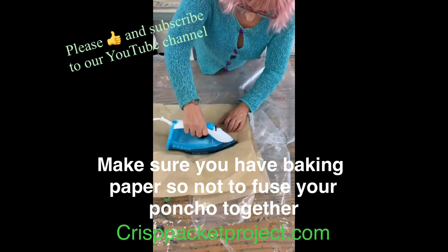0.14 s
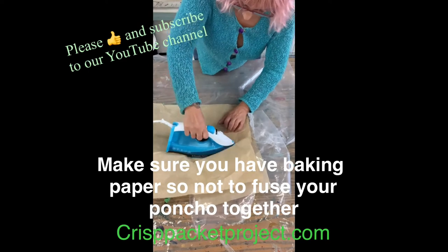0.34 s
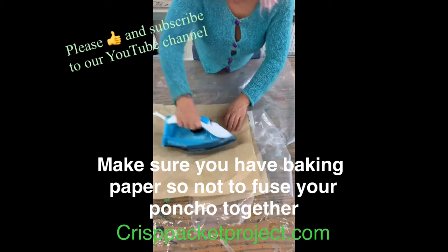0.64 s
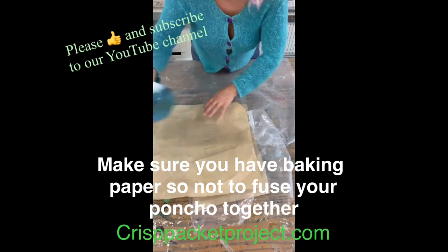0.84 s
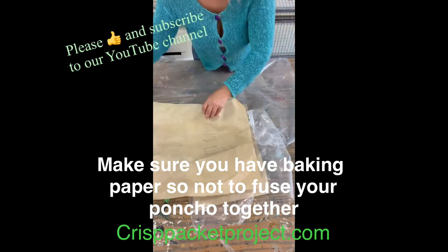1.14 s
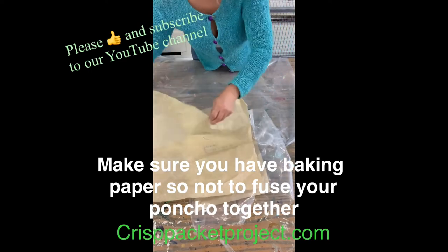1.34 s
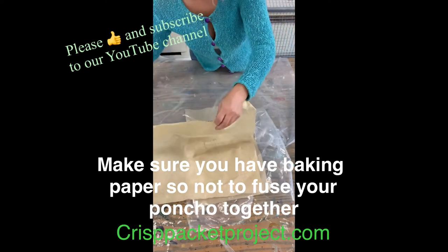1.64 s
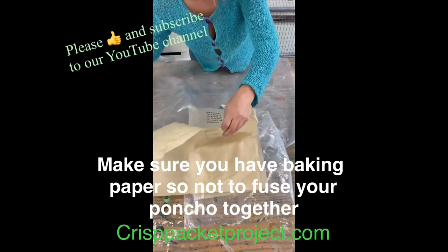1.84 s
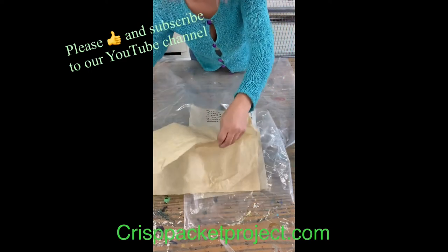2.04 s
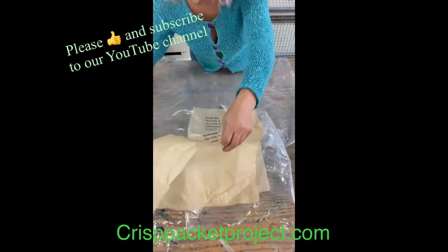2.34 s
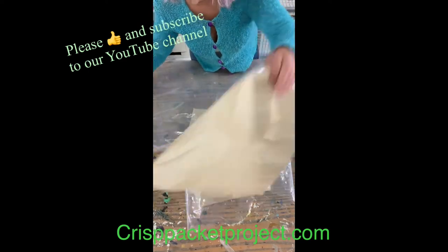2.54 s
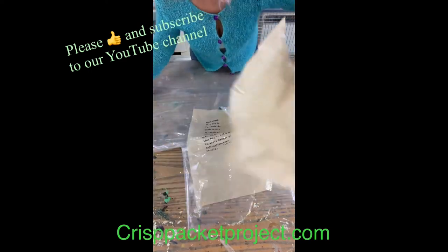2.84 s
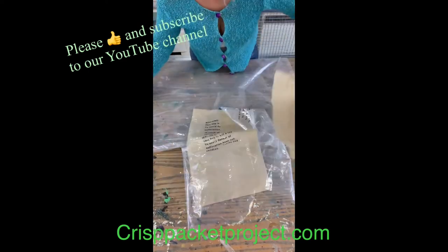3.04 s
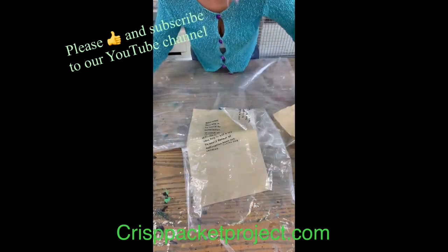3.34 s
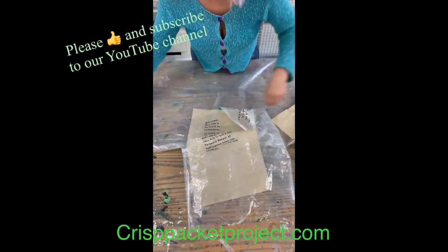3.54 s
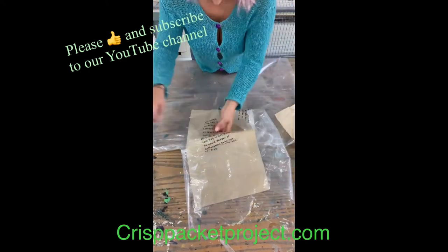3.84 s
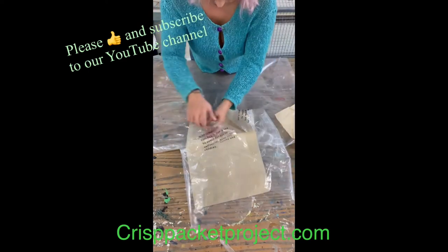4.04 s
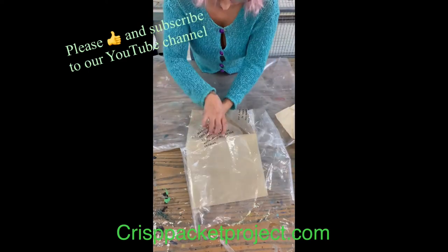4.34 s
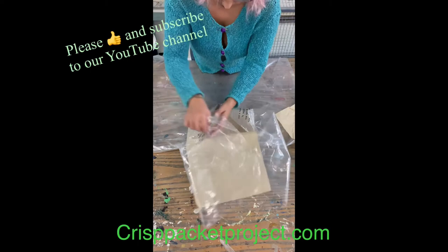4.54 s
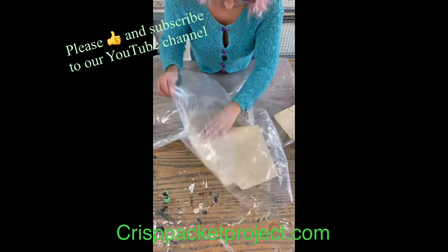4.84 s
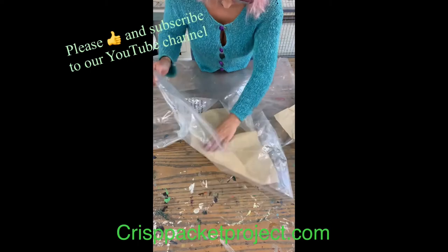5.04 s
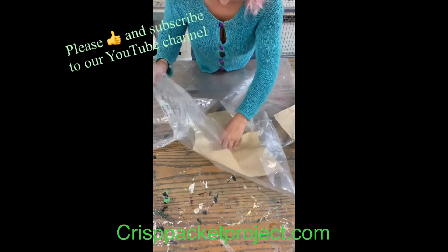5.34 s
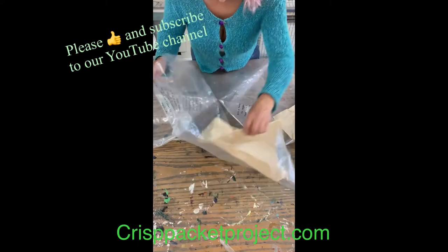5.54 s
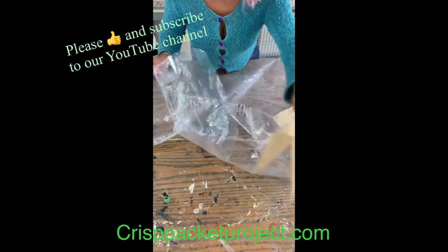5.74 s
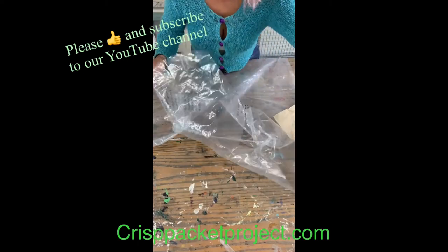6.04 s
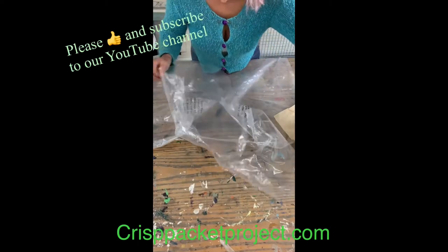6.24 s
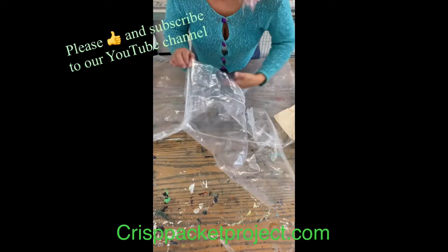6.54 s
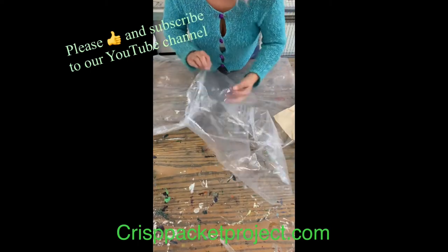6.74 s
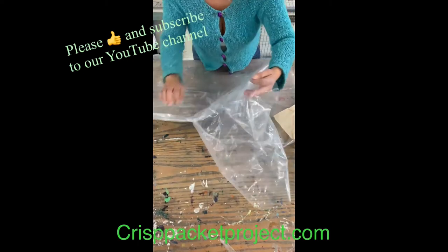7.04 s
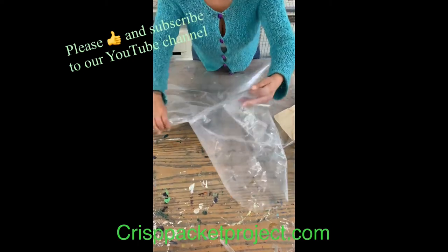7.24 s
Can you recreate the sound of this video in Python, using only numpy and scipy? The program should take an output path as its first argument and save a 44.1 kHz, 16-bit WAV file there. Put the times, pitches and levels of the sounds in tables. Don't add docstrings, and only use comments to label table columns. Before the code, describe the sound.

A close stereo phone pickup at a wooden table in a small, softly humming room. From 0 to 0.6 s stiff baking paper crinkles under a smoothing hand, with bright snaps and duller pops, then nearly stops around 0.8 to 1 s. From 1.1 s the crackle surges; an iron put down on a side board knocks hollowly at about 1.4 s and 1.5 s, hardest at 1.75 s, with a small rattle as it settles. Peeling paper crackles on to 2.4 s, pauses briefly, then snaps and flaps from 2.6 to 3.6 s. Around 3.8 to 4.8 s there are only light touches and faint plastic rustles. Film rustling builds from 4.9 s, densest and loudest at 5.2 to 5.7 s, with a muffled nudge near 5.6 s. Thinner, brighter crackles continue past 6 s and ease off, followed by soft, duller pops from 6.7 to 7.4 s.

```python
import sys
import numpy as np
from scipy import signal
from scipy.fft import rfft, irfft, next_fast_len
from scipy.io import wavfile
from scipy.ndimage import uniform_filter1d, minimum_filter1d, map_coordinates

SR = 44100
rng = np.random.default_rng(int(sys.argv[2]) if len(sys.argv) > 2 else 0)


def store_pcm(level_fs):
    pcm = np.round(np.clip(level_fs, -1, 1) * 32767).astype(np.int16)
    wavfile.write(sys.argv[1], SR, np.atleast_2d(pcm).T)


def ratio_of_db(decibels):
    return 10 ** (np.asarray(decibels, float) / 20)


N = 326340


def unit(x):
    return x / np.sqrt(np.mean(x ** 2) + 1e-20)


def along(points, hz):
    f, v = np.transpose(points)
    return np.interp(np.log(hz + 1), np.log(f + 1), v)


def curves(rows):
    s, *cols = np.transpose(rows)
    return [np.interp(np.arange(N) / SR, s, c) for c in cols]


def wobble(rate):
    knots = rng.standard_normal(int(N * rate / SR) + 4)
    return map_coordinates(knots, [np.arange(N) * rate / SR])


def filtered(x, response):
    m = next_fast_len(N + SR // 2)
    return irfft(rfft(x, m) * response(np.fft.rfftfreq(m, 1 / SR)), m)[..., :N]


def coloured(x, spectrum):
    ends = [(spectrum[0][0] / 2, -70)] + list(spectrum) + [(spectrum[-1][0] * 0.95, -70)]
    cepstrum = irfft(np.log(ratio_of_db(along(ends, np.fft.rfftfreq(4096, 1 / SR)))))
    cepstrum[1:2048] *= 2
    cepstrum[2049:] = 0
    kernel = irfft(np.exp(rfft(cepstrum)))
    return signal.fftconvolve(x, kernel / np.linalg.norm(kernel))[:N]


def bursts(blows, t60, count=12):
    t = np.arange(SR // 20) / SR
    shapes = rng.standard_normal((count, len(t))) * ratio_of_db(-60 * t / t60)
    shapes[:, 0] = 2.6
    which = rng.integers(count, size=N)
    out = np.zeros(N)
    for k in range(count):
        out += signal.fftconvolve(blows * (which == k), shapes[k] / np.linalg.norm(shapes[k]))[:N]
    return out


def patchy(x, depth_db):
    z = signal.stft(x, nperseg=256)[2]
    field = uniform_filter1d(rng.standard_normal(z.shape), size=7, axis=0)
    field = uniform_filter1d(field, size=12, axis=1)
    return signal.istft(z * ratio_of_db(depth_db * unit(field)), nperseg=256)[1][:N]


# peak_s, rise_s, fall_s, crackle_db, flex_over_crackle_db
PAPER_MOVES = [(0.12, 0.14, 0.19, -48.5, 4), (0.39, 0.066, 0.11, -48, 2.5), (0.5, 0.079, 0.11, -55, 4.5),
               (0.67, 0.053, 0.13, -58, 7), (0.97, 0.035, 0.09, -74, 17.5), (1.08, 0.026, 0.28, -50, -2.5),
               (1.23, 0.051, 0.67, -44, 3.5), (1.27, 0.066, 0.11, -41, 5.5), (1.32, 0.073, 0.46, -42, 6.5),
               (1.5, 0.56, 0.3, -51, 0), (1.7, 0.33, 0.12, -48.5, 1.5), (1.85, 0.093, 0.086, -50, 5.5),
               (2.08, 0.22, .05, -73, 17.5), (2.14, 0.048, 0.24, -44.5, 4), (2.27, 0.19, 0.14, -44.5, -0.5),
               (2.42, .15, 0.057, -56.5, -11), (2.59, 0.11, .05, -63.5, 9.5), (2.64, 0.05, 0.16, -47, 5),
               (2.74, 0.094, 0.06, -55, 6.5), (2.86, .11, 0.127, -55, 5.5), (3.01, 0.047, 0.14, -47.5, 1.5),
               (3.2, 0.078, 0.12, -55.5, 4), (3.33, 0.094, 0.2, -52.5, 1), (3.42, 0.15, 0.21, -48.5, -3.5),
               (3.53, .04, 0.067, -57, 4.5), (3.585, .02, 0.041, -58, 4), (3.67, 0.031, 0.074, -58.5, 7.5),
               (3.8, 0.065, 0.055, -63, 6)]
FILM_MOVES = [(3.825, 0.069, .04, -57.5, 6), (3.866, 0.03, 0.052, -51.5, 9), (3.924, .03, 0.052, -53, 2.5),
              (3.96, .1, 0.1, -63.5, 0), (4.05, .15, 0.1, -73.5, 13.5), (4.07, .15, .15, -66, 0),
              (4.2, 0.13, 0.16, -58.5, 6), (4.42, .15, .15, -67, 2), (4.517, .015, 0.17, -59.5, 7.5),
              (4.6, 0.14, 0.88, -59.5, 8), (4.7, 0.041, 0.089, -52, 8.5), (4.86, 0.33, .3, -62, -4),
              (4.93, 0.035, 0.16, -48, 7), (5.0, .1, 0.12, -51, 3.5), (5.05, .02, .1, -47, 2.5),
              (5.105, .02, .1, -46.5, 1), (5.165, .03, 0.11, -45, 1), (5.21, 0.098, .11, -39.5, 3.5),
              (5.34, 0.12, 0.61, -42.5, 1), (5.46, 0.029, 0.11, -40.5, 3.5), (5.51, 0.069, 0.078, -40.5, 5),
              (5.575, 0.044, .08, -42, 4), (5.63, 0.073, 0.029, -35.5, 4), (5.7, .1, 0.44, -48.5, -0.5),
              (5.81, .03, .1, -50, -2), (5.895, 0.053, 0.064, -43, -1.5), (5.945, .04, 0.07, -45.5, -0.5),
              (6.0, 0.16, 0.059, -52, 6), (6.23, 0.02, 0.1, -56, -7), (6.272, .025, .05, -48.5, -12),
              (6.315, 0.032, 0.068, -48, 0.5), (6.37, 0.066, .15, -54.5, 2), (6.55, 0.3, 0.16, -48.5, -7.5),
              (6.64, 0.24, 0.068, -56, 0.5), (6.737, 0.013, 0.04, -53.5, 12),
              (6.767, 0.011, 0.087, -51, 13), (6.81, 0.017, 0.049, -56, 13),
              (6.875, 0.033, .05, -56.5, 14.5), (6.925, .04, 0.051, -52.5, 12),
              (6.965, 0.017, 0.081, -60.5, 15), (7.06, 0.37, 0.11, -62.5, 14),
              (7.25, 0.092, .3, -70.5, 15.5), (7.36, 0.12, 0.16, -55.5, 9.5)]
FADE_DB, BEND = 20, 1.5


def effort(lingers=1, flexing=0, paper_db=0, film_db=0):
    t, power = np.arange(0, N + 64, 64) / SR, 1e-12
    for moves, sheet_db in ((PAPER_MOVES, paper_db), (FILM_MOVES, film_db)):
        for s, rise, fall, db, flex_db in moves:
            away = np.where(t < s, (s - t) / rise, (t - s) / fall) / lingers
            level_db = db + flexing * flex_db + sheet_db - FADE_DB * abs(away) ** BEND
            power = power + ratio_of_db(2 * level_db)
    return np.interp(np.arange(N) / SR, t, 10 * np.log10(power))


def buckles(spectrum, jerks, rate, spread_db, clump_db, t60, hiss):
    chance, size = rng.random((2, N))
    struck = np.clip(rate / SR / (chance + 1e-9) - 1, 0, 1)
    blows = struck * ratio_of_db(-spread_db * np.log(np.clip(size, .004, 1)))
    clumps = ratio_of_db(clump_db * (jerks + 0.53 * wobble(60)))
    grains = unit(bursts(blows, t60)) + hiss * rng.standard_normal(N)
    return unit(clumps * patchy(coloured(grains, spectrum), depth_db=2.0))


# freq_hz, level_db
CRACKLE = [(900, -30), (2100, -10), (3300, 0), (5500, -1.5), (7000, -4), (9500, -4), (13000, -8),
           (16300, -12)]
FLEX = [(300, -22), (600, -6), (1000, -2), (1500, -0.5), (2000, -5), (2600, -9), (3500, -10), (7500, -19.5)]
SAG = [(90, -12.5), (200, -5), (330, -1.5), (450, -3), (650, -5), (1000, -6.5)]
FLEX_LINGERS, SAG_LINGERS = 1.203, 1.59
PAPER_SAG_DB, FILM_SAG_DB = -5, -8.5
AIRBORNE_S, THIN_DB, THIN_HZ = 5.72, -8, 4040


def sheets():
    crackle_db, flex_db = effort(), effort(FLEX_LINGERS, 0.99)
    sag_db = effort(SAG_LINGERS, 1, PAPER_SAG_DB, FILM_SAG_DB)
    jerks = 0.45 * wobble(17) + 0.83 * wobble(55)
    crackle = buckles(CRACKLE, jerks, rate=2000, spread_db=2.0, clump_db=2.5, t60=0.0043, hiss=0.73)
    sheen = filtered(crackle, lambda hz: 1 / (1 + (9000 / (hz + 1)) ** 4))
    sheen_db = np.clip(0.36 * (crackle_db + 37.5), -7, 1.5)
    crackle += (ratio_of_db(sheen_db) - 1) * sheen
    airborne = np.arange(N) > AIRBORNE_S * SR
    crackle += airborne * (ratio_of_db(THIN_DB) - 1) * filtered(crackle, lambda hz: hz < THIN_HZ)
    flex = buckles(FLEX, jerks, rate=583, spread_db=2.5, clump_db=2.0, t60=0.021, hiss=1.0)
    sag = buckles(SAG, jerks, rate=150, spread_db=2.0, clump_db=0.5, t60=0.034, hiss=0.9)
    sag_level = ratio_of_db(np.minimum(sag_db, -44) - 4.0)
    return ratio_of_db(crackle_db + 3.0) * crackle + ratio_of_db(flex_db - 1.5) * flex + sag_level * sag


# freq_hz, level_db
CREASE = [(1500, -26), (3000, -5), (5000, -2), (8000, 0), (11000, -1.5), (14000, -3), (16800, -6)]
# start_s, peak_db
SNAPS = [(0.0346, -41.5), (0.0518, -39.5), (0.1096, -28.5), (0.1426, -28), (0.3716, -39),
         (0.4511, -40.5), (0.6589, -46.5), (0.7821, -51.5), (1.0373, -36.5), (1.072, -50),
         (1.0847, -33), (1.1997, -41), (1.225, -31), (1.264, -26), (1.3314, -23.5), (1.3543, -38),
         (1.3887, -35), (1.6202, -35), (1.6648, -39), (1.6816, -29.5), (1.7709, -35.5),
         (1.8262, -40), (1.8497, -37), (1.8806, -36), (2.0016, -46), (2.0657, -54), (2.0951, -41),
         (2.1171, -33.5), (2.15, -33.5), (2.2303, -33),
         (2.5985, -32), (2.6304, -34.5), (2.643, -23.5), (2.762, -34.5), (2.8211, -50),
                 (2.8341, -36), (2.8632, -32), (2.9084, -39), (2.974, -29.5), (2.9925, -27), (3.034, -21),
                 (3.0576, -26), (3.0887, -36), (3.143, -34), (3.186, -40), (3.2516, -39.5), (3.4226, -27.5),
                 (3.527, -34.5), (3.8523, -45), (3.9183, -36.5), (4.137, -47), (4.196, -37.5),
                 (4.2158, -39), (4.2435, -41), (4.5133, -59), (4.6854, -35), (4.7115, -35), (4.8095, -33.5),
                 (4.8605, -38.5), (4.916, -40),
         (4.9158, -37), (5.0405, -28.5), (5.1008, -27.5), (5.1602, -27), (5.2191, -28),
                 (5.2815, -31), (5.3363, -23), (5.3992, -26.5), (5.4421, -31), (5.4616, -30), (5.5933, -33),
                 (5.6915, -32.5), (5.7289, -29.5), (5.7812, -35.5), (5.7993, -28.5), (5.8336, -32.5),
                 (5.8703, -36), (5.8892, -25.5), (5.926, -27.5), (5.9454, -25), (6.0134, -32.5),
                 (6.1103, -47.5), (6.2216, -42), (6.2699, -37), (6.7335, -39.5), (6.7632, -37.5),
                 (6.8469, -34), (6.9044, -35), (7.0983, -42), (7.3458, -38.5),
         (0.679, -45), (2.555, -43), (2.6542, -33), (2.9856, -31.5), (3.0125, -34), (4.264, -50.5),
               (4.287, -49), (4.4444, -57), (6.2975, -31.5), (6.3134, -31.5), (6.6049, -34),
         (2.7365, -37), (2.8853, -42), (2.9342, -48.5), (2.966, -34.5), (3.0934, -37), (3.27, -51),
               (3.2874, -42.5), (3.3197, -43), (3.3982, -39), (3.44, -40), (3.5817, -49), (3.6656, -54.5),
               (3.863, -39), (3.926, -42.5), (4.1465, -51), (4.157, -42), (4.594, -43), (4.929, -31.5),
               (5.1113, -34), (5.7104, -38), (5.8774, -32), (5.9016, -25.5), (6.3224, -33), (6.4368, -39.5),
               (6.599, -43), (6.7677, -41), (6.8936, -38.5), (6.9621, -41), (7.0329, -49), (7.2416, -53),
               (7.2744, -49), (7.2903, -44), (7.309, -50)]
# start_s, peak_db, pitch_hz
FOLDS = [(0.035, -34.5, 985), (0.108, -27, 1160), (0.249, -40, 1260), (0.409, -30, 1040),
         (0.474, -38, 1196), (0.635, -45, 1380), (1.037, -50, 1230), (1.083, -40, 1720),
         (1.108, -38, 1415), (1.2, -34, 1260), (1.332, -25, 1630), (1.368, -26, 663),
         (1.396, -24, 1480), (1.516, -30, 1324), (1.649, -32, 1210), (1.664, -33, 1373),
         (1.743, -25, 1614), (1.772, -24, 1115), (1.881, -34, 1370), (1.988, -37, 894),
         (2.104, -39, 1220), (2.565, -46, 1450), (2.642, -31, 1460), (2.663, -33, 1540),
         (2.762, -36, 1970), (2.862, -36, 1590), (2.974, -37, 1770), (3.035, -35, 1980),
         (3.142, -50, 1080), (3.276, -37.5, 1340), (3.288, -34, 1140), (3.415, -39, 1800),
         (3.581, -48, 1760), (3.591, -45, 1950), (3.768, -47, 1040), (3.86, -31.5, 624),
         (3.923, -39, 1420), (4.101, -44.5, 1390), (4.198, -44, 1124), (4.226, -35.5, 1457),
         (4.264, -35, 1430), (4.288, -34.5, 2020),
         (4.513, -44, 817), (4.596, -39, 860), (4.686, -33, 1260), (4.809, -35, 2100),
              (4.919, -28, 790), (4.928, -31, 830), (5.1, -31, 1280), (5.112, -32, 1230),
              (5.169, -33, 1180), (5.214, -29, 1270), (5.304, -37, 1040), (5.401, -33, 1255),
              (5.45, -30.5, 1430), (5.488, -23, 2000), (5.506, -28, 1320), (5.515, -23, 1233),
              (5.566, -26.5, 1330), (5.574, -25, 743), (5.704, -33, 1410), (5.728, -30, 1570),
              (5.866, -43, 1420), (5.889, -32.5, 1520), (6.081, -45, 1214), (6.304, -44, 903),
              (6.355, -48, 1166), (6.733, -30.5, 2420), (6.743, -37, 1370), (6.763, -32.5, 1540),
              (6.805, -29.5, 1540), (6.846, -30, 1500), (6.87, -32, 1220), (6.896, -30.5, 774),
              (6.904, -33, 1230), (6.921, -32, 1440), (6.962, -29.5, 1224), (7.032, -38, 1770),
              (7.052, -34, 620), (7.232, -38, 770), (7.338, -39, 832)]
STRAY_PER_S, STRAY_DB, STRAY_SPREAD_DB = 10, 16.5, 2.5
FILM_FROM_S = 3.8
PAPER_TICK_T60, FILM_TICK_T60, FILM_TICK_DB = 0.0044, 0.011, 0
FILM_TICK_TOP_HZ = 12000
RING_DB, RING_T60, RING_BLUR = -3.5, 0.031, .05


def snaps():
    chance, size = rng.random((2, N))
    stray_db = effort() + STRAY_DB - STRAY_SPREAD_DB * np.log(size + 0.019)
    tick = (chance < STRAY_PER_S / SR) * ratio_of_db(stray_db)
    s, db = np.transpose(SNAPS)
    tick[np.round(s * SR).astype(int)] = ratio_of_db(db + 11.5)
    pop, ring, t = np.zeros(N), np.zeros(N + SR), np.arange(SR // 20) / SR
    for s, db, hz in FOLDS:
        start = round(s * SR)
        pop[start] = ratio_of_db(db + 12)
        phase = 2 * np.pi * hz * t + RING_BLUR * np.cumsum(rng.standard_normal(len(t)))
        swell = 1 - np.exp(-t * hz)
        ring[start:][:len(t)] += ratio_of_db(db + RING_DB - 60 * t / RING_T60) * np.sin(phase) * swell
    film = np.arange(N) > FILM_FROM_S * SR
    soft = bursts(tick * film, FILM_TICK_T60, count=8)
    soft = filtered(soft, lambda hz: 1 / (1 + 1j * hz / FILM_TICK_TOP_HZ) ** 2)
    bright = bursts(tick * ~film, PAPER_TICK_T60, count=8) + ratio_of_db(FILM_TICK_DB) * soft
    bright += ratio_of_db(-2.5) * bursts(tick, t60=.028, count=8)
    body = bursts(pop + ratio_of_db(-5.0) * tick, t60=0.021, count=12)
    return coloured(bright, CREASE) + coloured(body, FLEX) + ring[:N]


# start_s, peak_db, brightness_db, lowest_modes_db
KNOCKS = [
    (0.791, -51, -24, 11),
    (1.368, -25, 0, 7),
    (1.399, -50, -6, 16),
    (1.433, -34, -5, 6.5),
    (1.517, -29.5, -3.5, 4),
    (1.744, -16, 1, 1),
    (1.774, -36, 12, -14),
    (1.809, -26, -3, -1),
    (2.86, -38, -10, -11),
    (5.581, -36, -15, 1),
]
# freq_hz, level_db, t60_s
BOARD = [(62, -8, 0.5), (85, -5, 0.33), (105.9, -8, 0.35), (134.4, -1, 0.45), (187.9, -7, 0.31),
         (214.3, -3, 0.13), (257.7, -16.5, 0.29), (353, -8, 0.2), (394.4, -11, 0.25), (426, -8, 0.217),
         (511, -13, 0.19), (553, -16, 0.14), (610, -19, 0.25), (668, -22, 0.23)]


def iron():
    out, t = np.zeros(N + SR), np.arange(SR // 2) / SR
    hz, level_db, t60 = np.transpose(BOARD)[:, :, None]
    for s, db, bright_db, low_db in KNOCKS:
        tone_db = np.interp(np.log(hz), np.log([100, 180, 600]), [low_db, 0, bright_db])
        level = ratio_of_db(level_db + tone_db + 0.8 * rng.standard_normal(hz.shape) - 60 * t / t60)
        wander = 0.045 * np.cumsum(rng.standard_normal(level.shape), 1) * np.sqrt(hz / 3000)
        build_up = 1 - np.exp(-(t * hz / 0.41) ** 2)
        ring = level * np.sin(2 * np.pi * hz * t + wander) * build_up
        tap = ratio_of_db(bright_db - 10.0 - 60 * t / 0.017) * np.sin(2 * np.pi * 1100 * t)
        out[round(s * SR):][:len(t)] += ratio_of_db(db - 5.0) * (ring.sum(0) + tap)
    return out[:N]


# freq_hz, t60_s
ROOM = [(150, 0.59), (1000, 0.16), (4000, 0.14), (12000, 0.031)]


def tail(x, t60_scale):
    hz, t, z = signal.stft(rng.standard_normal(SR // 2), SR, nperseg=256)
    t60 = t60_scale * along(ROOM, hz)[:, None]
    echo = signal.istft(z * ratio_of_db(-60 * t / t60), SR, nperseg=256)[1]
    return signal.fftconvolve(x, echo / np.linalg.norm(echo))[:N]


# time_s, rumble_db
ROOM_HUM = [(0.0, -43), (0.14, -54), (0.9, -57.5), (1.36, -52.5), (1.9, -50), (2.53, -54), (3.01, -49.5),
            (3.1, -53), (3.5, -51), (4.12, -52), (4.17, -58), (5.5, -54), (5.96, -49), (6.33, -51),
            (6.47, -45.5), (6.78, -53), (7.07, -49), (7.4, -52)]
# freq_hz, level_db_per_hz
RUMBLE = [(24, -15), (35, -5), (48, 4.5), (60, 10.5), (80, -2.5), (107, -4.5), (160, -13), (250, -29)]
AIR = [(150, 3.5), (260, 1.5), (390, -11), (540, -6), (1500, -8.5), (2300, -21), (4000, -24), (12000, -51)]
# freq_hz, width_hz, level_db
DRONE = [(271.3, 18.4, -70), (1036, 26, -71), (1217, 94, -73)]


def background():
    rumble_db, = curves(ROOM_HUM)
    out = ratio_of_db(rumble_db) * unit(coloured(rng.standard_normal(N), RUMBLE))
    for centre, width, drone_db in DRONE:
        narrow = filtered(rng.standard_normal(N), lambda hz: np.exp(-((hz - centre) / width) ** 2))
        out += ratio_of_db(drone_db) * unit(narrow)
    return out + ratio_of_db(-62.5) * unit(coloured(rng.standard_normal(N), AIR))


# freq_hz, differing_share
APART = [(150, .02), (400, .17), (900, .26), (1500, .26), (2200, .36), (3000, .6), (3700, .3), (4300, .05)]


def scene():
    near, knocks = sheets() + snaps(), iron()
    echo = tail(near + ratio_of_db(-9) * knocks, t60_scale=0.57)
    sound = near + knocks + ratio_of_db(-9.5) * echo + background()
    z = signal.stft(sound, nperseg=256)[2]
    scrambled = z * np.exp(2j * np.pi * rng.random(z.shape))
    other = unit(signal.istft(scrambled, nperseg=256)[1][:N]) * np.std(sound)
    share = lambda hz: np.clip(along(APART, hz), 0, .95)
    scattered = filtered(other, share)
    shared = filtered(sound, lambda hz: np.sqrt(1 - share(hz) ** 2))
    return np.array([shared + scattered, shared - scattered])


# which, low_hz, high_hz
WEAK = [(0, 4150, 5150), (1, 7600, 9600), (0, 11750, 14200)]
# freq_hz, level_db
HEARD = [(9000, -135), (11500, -112), (15500, -105)]
TOP_HZ = 15750


def joint_stereo(x, sudden_share, ragged_hz, blur, spill):
    slope = signal.windows.kaiser_bessel_derived(2048, 4 * np.pi)
    hz, _, z = signal.stft([x[0] + x[1], x[0] - x[1]], SR, window=slope, nperseg=2048)
    line, frames = hz[:, None], z.shape[2]
    power = np.add.reduceat(abs(z) ** 2, np.arange(0, len(hz), 16), axis=1) / 16
    power *= ratio_of_db(rng.normal(0, 9, power.shape))
    heard = power[:, np.arange(len(hz)) // 16] > ratio_of_db(2 * along(HEARD, line))
    keep = heard & (line < TOP_HZ)
    for which, low, high in WEAK:
        edges = ragged_hz * np.round(rng.standard_normal((2, frames)))[:, np.arange(frames) // 3]
        keep[which] &= (line < low + edges[0]) | (line > high + edges[1] * high / 7000)
    bright = abs(uniform_filter1d(np.diff(x[1], 2) ** 2, size=128))
    blocks = np.pad(bright, (512, frames * 1024))[:frames * 1024].reshape(-1, 1024)
    usual = np.quantile(np.hstack([blocks, np.roll(blocks, 1, 0)]), .3, axis=1)
    leap = blocks.max(1) / (usual + 1e-20)
    sudden = leap > np.quantile(leap, 1 - np.clip(sudden_share, 0, 1))
    z[1] *= np.exp(1j * blur * rng.standard_normal(z[1].shape) * (line > 4500) * ~sudden)
    z[0] += spill * 1j * z[1] * sudden * ~keep[0]
    both = signal.istft(z * (keep | sudden), SR, window=slope, nperseg=2048)[1][:, :N] / 2
    click = blocks > np.maximum(blocks.max(1) / 5, 3 * np.median(blocks, 1))[:, None]
    near = -minimum_filter1d(-1. * click.ravel(), size=193)
    most_sudden = np.repeat(leap > np.quantile(leap, .91), 1024)
    hush = uniform_filter1d(most_sudden * (1 - near), size=64)[512:][:N]
    sum_only = np.array([[1], [0]], bool)
    weak = filtered(both, lambda hz: (hz > WEAK[2][1]) | (abs(hz - 4500) < 550) * sum_only)
    mid, side = both - hush * weak
    return np.array([mid + side, mid - side])


def roll_off(x):
    return signal.sosfilt(signal.butter(12, 16990, fs=SR, output="sos"), x)


# freq_hz, left_over_right_db
TILT = [(60, 1.4), (200, 2), (380, 4), (700, 1.5), (1290, -1), (2380, -3), (3800, 0)]
# freq_hz, phase_rad
CATCH_UP = [(200, 0), (600, 0), (1400, 0.31), (2200, 0.19), (3500, 0.0065)]
LAG = 5


def record(dry):
    late = lambda hz: np.exp(1j * along(CATCH_UP, hz) - 2j * np.pi * hz * LAG / SR)
    cut = lambda hz: (1j * hz / (38 + 1j * hz)) ** 2
    left = lambda hz: ratio_of_db(along(TILT, hz) / 2) * late(hz)
    right = lambda hz: ratio_of_db(-along(TILT, hz) / 2)
    heard = filtered(dry, lambda hz: cut(hz) * [left(hz), right(hz)])
    mix = joint_stereo(heard, sudden_share=.21, ragged_hz=250, blur=1.1, spill=.25)
    return roll_off(mix)


dry = scene()
out = record(dry)
store_pcm(out)
```